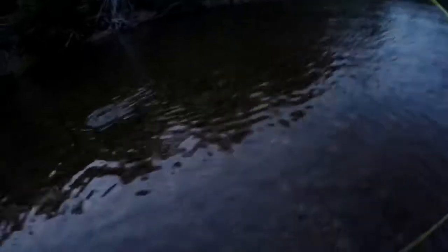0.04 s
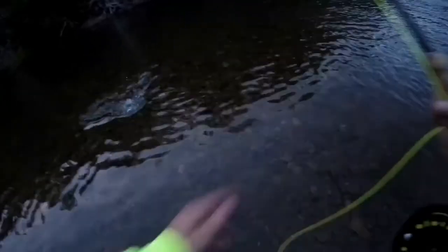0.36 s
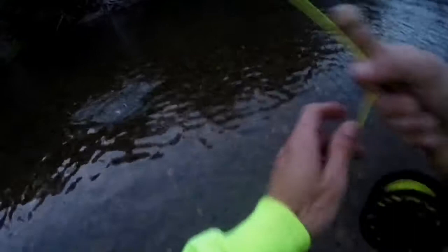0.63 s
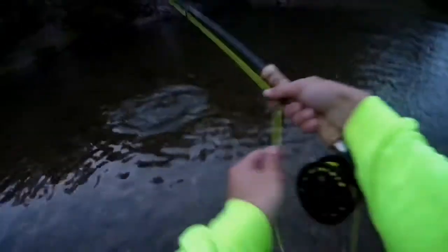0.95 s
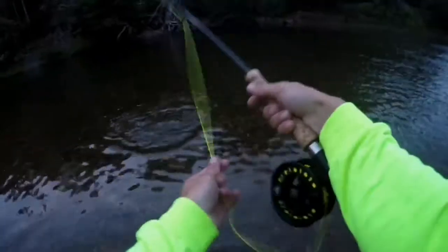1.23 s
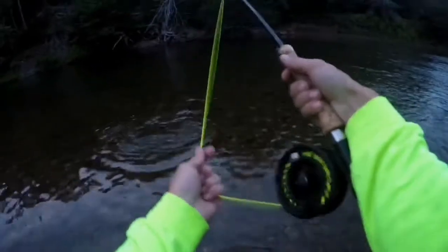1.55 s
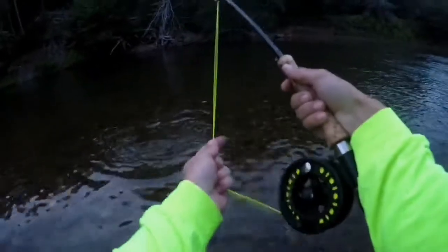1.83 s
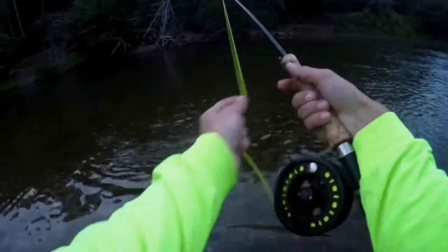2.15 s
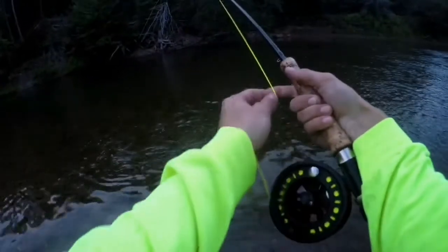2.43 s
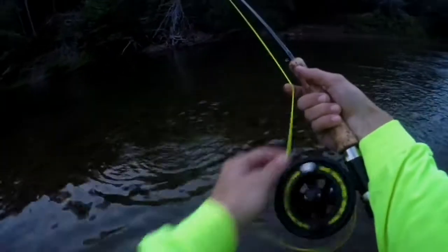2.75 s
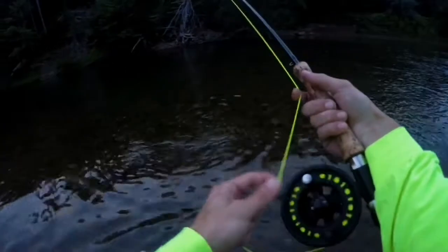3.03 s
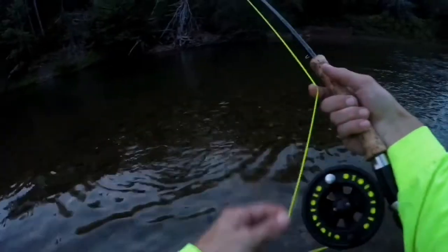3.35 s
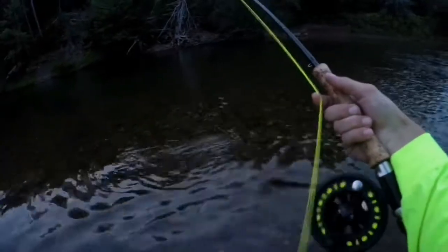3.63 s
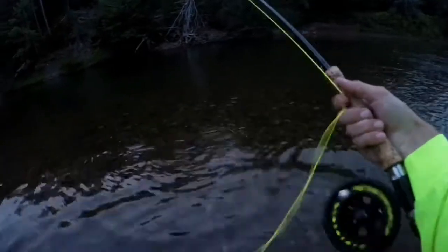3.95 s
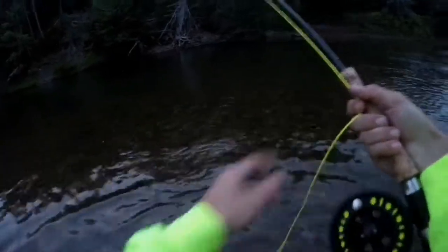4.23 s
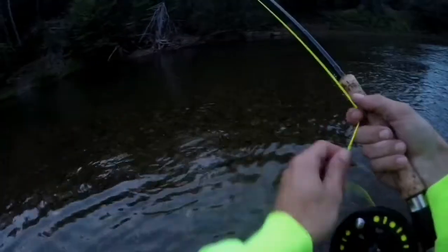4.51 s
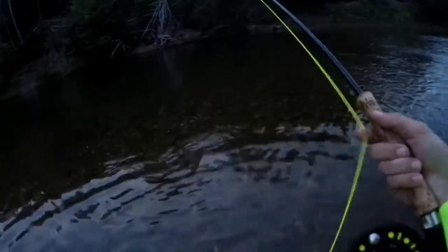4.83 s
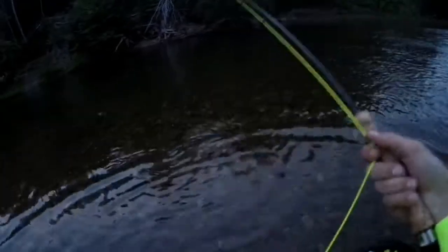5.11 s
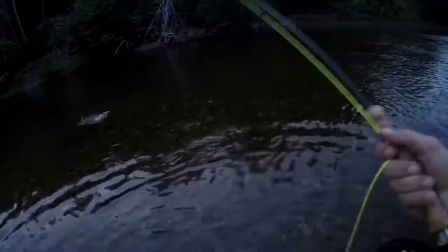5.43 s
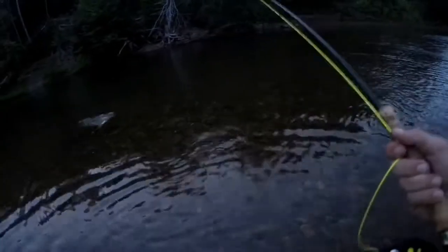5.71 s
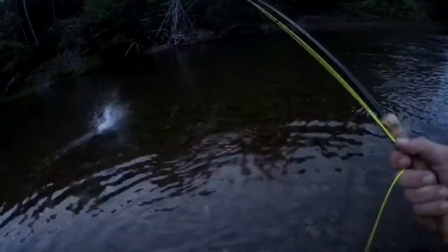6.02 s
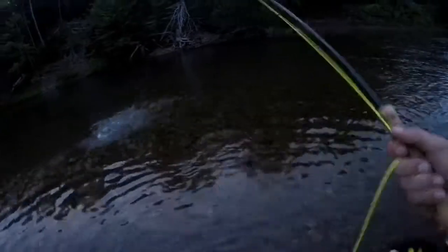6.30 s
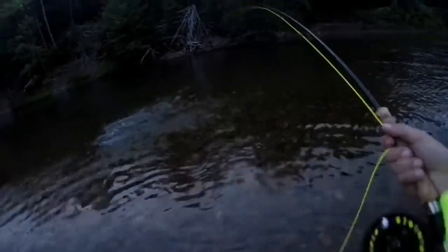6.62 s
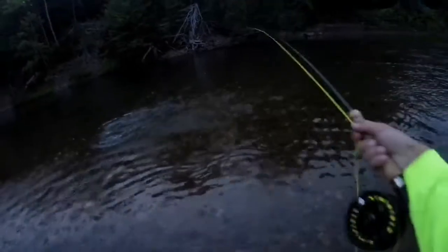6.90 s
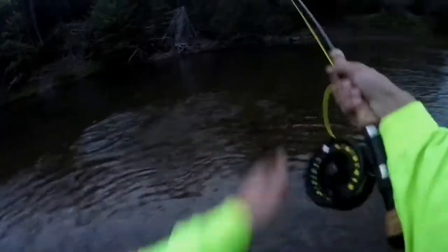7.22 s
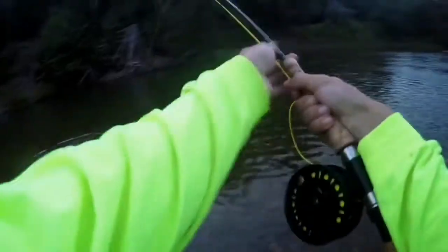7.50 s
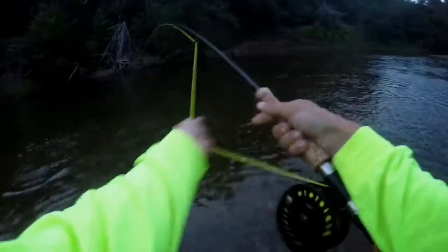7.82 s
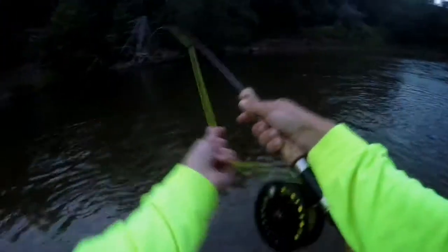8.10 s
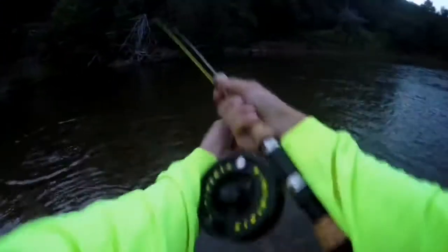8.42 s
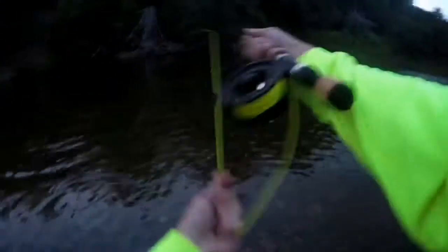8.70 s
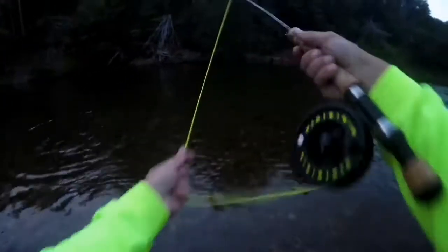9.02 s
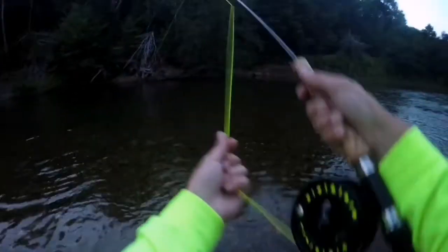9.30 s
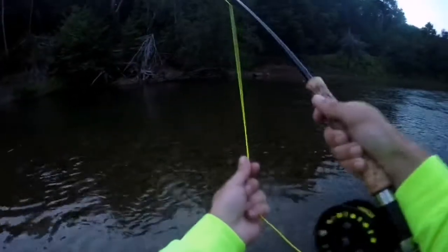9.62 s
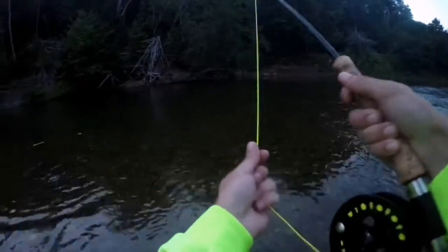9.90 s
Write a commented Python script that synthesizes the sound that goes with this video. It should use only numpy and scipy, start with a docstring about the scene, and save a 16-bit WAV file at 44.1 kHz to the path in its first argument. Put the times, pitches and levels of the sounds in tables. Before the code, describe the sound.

Sleeves swish and wet fishing line rasps softly through the rod rings, over the low rumble and bumps of a body-worn microphone. A fly reel gives short, bright bursts of clicks. About halfway through, a fish splashes lightly, with drops and bubbles. Louder rustling, knocks and thumps follow, with more quick ratcheting near the end. A river washes faintly underneath.

```python
"""A fly reel clicks in short bursts as an angler plays a fish: each tug turns the spool, and the pawl
strikes it once per tooth, exciting its modes. Friction makes the wet line rasp in the rod rings and
the sleeves swish. A body-worn camera rumbles on its mount and is bumped, and the gear knocks.
The fish splashes, trapping bubbles that ring, over the quiet wash of the river."""
import sys
import numpy as np
from scipy import signal
from scipy.fft import rfft, irfft, next_fast_len
from scipy.io import wavfile
from scipy.ndimage import uniform_filter1d

SR = 44100
rng = np.random.default_rng(int(sys.argv[2]) if len(sys.argv) > 2 else 0)


def wrap_up_sound(samples):
    """Save the sound to the file named by the first command line argument, as 16-bit audio."""
    columns = np.atleast_2d(samples).T
    # keep every value between -1 and 1, then stretch to whole-number steps
    tamed = np.clip(columns, -1, 1)
    steps = np.round(tamed * 32767).astype(np.int16)
    wavfile.write(sys.argv[1], SR, steps)


N = 438794
TIME = np.arange(N) / SR


def amp(db):
    """Amplitude ratio of a level in decibels."""
    return np.exp(np.asarray(db) * (np.log(10) / 20))


def unit(x):
    """Normalisation to rms 1."""
    return x / np.sqrt(np.mean(x ** 2) + 1e-20)


def add(mix, s, sound):
    """Superposition: a sound joins the mix at s seconds."""
    part = mix[max(round(s * SR), 0):][:len(sound)]
    part += sound[:len(part)]


def butter(order, hz, kind="low"):
    """Maximally flat filter, as second-order sections."""
    return signal.butter(order, hz, kind, fs=SR, output="sos")


def colour(x, spectrum, resonances=()):
    """Spectral shaping by a broad envelope with resonance peaks; white noise keeps its power."""
    size = next_fast_len(len(x), True)
    hz = np.fft.rfftfreq(size, 1 / SR)
    points_hz, points_db = np.transpose(spectrum)
    broad_db = np.interp(np.log(hz + 1), np.log(points_hz), points_db)
    peaks_db = sum(db / (1 + (2 * (hz - centre) / width) ** 2) for centre, width, db in resonances)
    bass_cut = hz / (hz + points_hz[0] / 2)
    return irfft(rfft(x, size) * unit(amp(broad_db + peaks_db) * bass_cut), size)[:len(x)]


def wander(per_s):
    """Random modulation: smooth noise of rms 1 with a bandwidth of about per_s hertz."""
    size, rate = 16384, 1500
    hz = np.fft.rfftfreq(size, 1 / rate)
    slow = irfft(rfft(rng.standard_normal(size)) * np.exp(-(hz / per_s) ** 2), size)
    return unit(np.interp(TIME, np.arange(size) / rate, slow))


def grains(per_s, spread_db, size=N):
    """Shot noise of rms 1: random impulses, mostly small and a few large."""
    strength = amp(spread_db * np.minimum(rng.exponential(1, size), 4))
    return unit(strength * rng.choice([-1, 1], size) * (rng.random(size) < per_s / SR))


def ring(modes, t, phase=None):
    """Free vibration: a sum of damped modes, excited a little differently at each strike."""
    hz, db, t60 = np.transpose(modes)
    strength = amp(db + rng.standard_normal(len(hz)))
    phase = rng.random(len(hz)) if phase is None else phase
    decay = np.exp(-np.log(1000) * t / t60[:, None])
    return strength @ (np.sin(2 * np.pi * (hz[:, None] * t + phase[:, None])) * decay)


def swells(rows, shape=1.29):
    """Incoherent addition: envelopes sum in power. A shape below 2 is more pointed than a bell."""
    t, power = TIME[::64], 0
    for s, rise_s, fall_s, db in rows:
        away = abs((t - s) / np.where(t < s, rise_s, fall_s))
        power = power + (amp(db) * np.exp(-away ** shape)) ** 2
    return np.interp(TIME, t, np.sqrt(power))


# wash of the river: (frequency [Hz], spectral level [dB])
RIVER_SPECTRUM = [(200, 5.5), (350, -3), (450, -2), (520, -8), (700, -5), (1000, -8.5), (1300, -8),
                  (2000, -11.5), (2350, -10.5), (3600, -12), (5000, -13.5), (8000, -19.5), (12000, -24),
                  (15500, -32)]

def river(level_db=-58.5, ripple_db=0.74):
    """Broadband noise with slight amplitude modulation: the even wash of slow water."""
    return amp(level_db + ripple_db * wander(per_s=16)) * colour(rng.standard_normal(N), RIVER_SPECTRUM)


def bubble(hz, t, cycles=12, glide=3):
    """Bubble resonance: trapped air pulsates as a damped oscillator, rising in pitch."""
    tone = np.sin(2 * np.pi * hz * t * (1 + glide * t))
    return tone * np.exp(-t * hz / cycles) * (1 - np.exp(-t * hz / 2))


# spray thrown up by the fish: (time of peak [s], rise [s], fall [s], level [dB])
SPRAYS = [(5.22, .1, 0.16, -61), (5.768, 0.0097, 0.034, -42.5), (5.862, 0.024, 0.029, -39.5),
          (6.1, 0.58, .38, -54.5)]
# slaps and drops on the water: (time [s], level [dB], bubble frequency [Hz])
DROPS = [(4.7884, -24.5, 2830), (5.1646, -30.5, 2590), (5.237, -34, 2380), (5.2724, -29.5, 1450),
         (5.2919, -35, 1820), (5.494, -31, 1880), (5.59, -36, 1870), (5.7294, -36, 2840),
         (5.759, -28.5, 2660), (5.7744, -31, 2230), (5.8446, -28, 1950), (5.8815, -25, 2480),
         (5.92, -31.5, 1680), (6.0888, -31, 3500), (6.1594, -33.5, 1900), (6.2684, -30, 2560)]
# splashing: (frequency [Hz], spectral level [dB])
SPLASH_SPECTRUM = [(300, -9), (520, -4.5), (650, 1.5), (850, -10.5), (1050, -3), (1300, -9.5), (1700, 2),
                   (2600, 1.5), (3100, -7), (3650, 5), (4300, -12), (5200, -5), (6200, -12.5),
                   (15000, -23.5)]

def fish(spray_db=-0.5, hiss_db=-3, slap_db=-11, slap_s=0.0037, bubble_db=-9):
    """Impact and air entrainment: slaps trap bubbles, and spray falls back as many small drops."""
    t = np.arange(SR // 16) / SR
    patter, bubbles = np.zeros(2 * SR), np.zeros(N)
    for hz in np.geomspace(600, 7000, 24):
        impacts = grains(per_s=90, spread_db=3.5, size=len(patter))
        patter += signal.oaconvolve(impacts, hz * bubble(hz, t, cycles=5.8), "same")
    spray = np.resize(unit(patter), N) / 2 + amp(hiss_db) * rng.standard_normal(N)
    splash = amp(spray_db) * swells(SPRAYS) * spray
    slap_envelope = (1 - np.exp(-t / 0.0016)) * np.exp(-t / slap_s)
    for s, db, hz in DROPS:
        add(splash, s, amp(db + slap_db) * rng.standard_normal(len(t)) * slap_envelope)
        add(bubbles, s, amp(db + bubble_db) * bubble(hz, t))
    return colour(splash, SPLASH_SPECTRUM) + bubbles


# arm strokes: (time of peak speed [s], rise [s], fall [s], level [dB], relative treble [dB])
STROKES = [(.06, 0.14, 0.069, -45, -4.5), (.4, .22, .14, -44.5, 1), (.66, .03, .05, -51, -4),
           (.89, 0.12, 0.11, -43, -5.5), (1.2, 0.15, 0.094, -51.5, -3), (1.47, 0.083, .09, -52, -2),
           (1.85, 0.13, 0.049, -53.5, 1), (2, 0.1, 0.13, -54.5, 0.5), (2.18, 0.036, 0.036, -54.5, -1),
           (2.39, 0.036, 0.089, -52, -2.5), (2.57, 0.063, 0.037, -48.5, -3), (2.67, 0.032, 0.026, -51, 5),
           (2.77, 0.087, 0.13, -48.5, 3), (3.09, .03, 0.042, -54, 3.5), (3.21, .05, .03, -49, 2),
           (3.4, 0.092, 0.099, -59, 6), (3.82, 0.33, 0.14, -53.5, -2), (4.3, 0.16, 0.089, -55, -1),
           (4.9, 0.23, 0.3, -55.5, 2), (5.39, 0.085, 0.052, -58, 5), (6.56, .06, .06, -56, 0),
           (6.72, .07, .12, -53, -1.5), (6.96, .02, 0.029, -55, 9), (7.23, .12, 0.11, -35, -2.5),
           (7.52, 0.11, 0.1, -52.5, -4), (7.79, 0.16, 0.12, -49, 2), (8.14, 0.23, 0.16, -50, 1.5),
           (8.26, 0.039, 0.049, -38.5, -4), (8.34, 0.02, 0.025, -37, 1.5), (8.46, .05, .16, -42.5, -2),
           (8.7, 0.064, 0.1, -46.5, 4.5), (8.86, 0.1, 0.093, -48, 6), (9.08, 0.27, .06, -55, -6),
           (9.235, .03, 0.11, -54, 2), (9.33, .03, .1, -55.5, 2), (9.89, 0.2, 0.088, -59, -2)]

def arms(rest_db=-63):
    """Friction noise grows with sliding speed: body and treble envelopes of cloth never quite at rest."""
    body = swells([(s, rise, fall, db) for s, rise, fall, db, _ in STROKES])
    treble = swells([(s, rise, fall, db + treble_db) for s, rise, fall, db, treble_db in STROKES])
    return np.hypot([body, treble], amp(rest_db))


def rumble(spectrum, even_s):
    """Amplitude levelling: coloured noise divided by its running rms over even_s seconds."""
    noise = colour(rng.standard_normal(N), spectrum)
    return noise / np.sqrt(uniform_filter1d(noise ** 2, int(even_s * SR)) + 1e-3)


# lurches of the angler's body: (time [s], level [dB], half length [s])
LURCHES = [(.5, -33.5, 0.11), (0.966, -24, 0.074), (1.076, -20, 0.049), (1.272, -28, 0.15),
           (2, -27.5, 0.039), (3.173, -24, 0.03), (3.548, -27, 0.036), (3.894, -24.5, 0.049),
           (4.705, -25.5, 0.041), (5.103, -24, 0.057), (5.293, -35, 0.055), (5.486, -21.5, 0.043),
           (5.837, -28, 0.17), (6.245, -23, 0.027), (6.66, -27.5, 0.12), (7.406, -25.5, 0.22),
           (7.9, -23.5, 0.22), (8.35, -14, 0.095), (8.542, -16.5, 0.075), (8.95, -29, .15),
           (9.258, -25, 0.028), (9.75, -33, 0.21)]
# quick moves that jolt the mount: (time [s], level [dB])
JOLTS = [(.055, -25.5), (.46, -33.5), (2.82, -38), (3.12, -42), (3.25, -42), (4.33, -45), (4.65, -43.5),
         (5.02, -44.5), (5.44, -45.5), (6.57, -42.5), (7.15, -32), (7.89, -37.5), (9.23, -42)]
# running shudder of the mount: (time [s], level [dB])
SHUDDER_LEVELS = [(0, -34), (.2, -37.5), (.95, -35), (1.25, -48), (2.1, -47.5), (2.25, -60), (2.7, -45),
                  (2.95, -57.5), (4.6, -49.5), (5.8, -55), (6.85, -52), (7.38, -27), (7.48, -47.5),
                  (8.15, -43.5), (8.3, -33.5), (8.7, -31), (8.8, -42.5), (9.95, -54.5)]
# slow sway and quicker shudder: (frequency [Hz], spectral level [dB])
SWAY_SPECTRUM = [(5, -17), (11, 0), (18, 5), (24, -1), (36, -7.5), (50, -13.5), (70, -24.5), (110, -31.5),
                 (250, -80.5)]
SHUDDER_SPECTRUM = [(40, -11), (70, -3), (100, 0.5), (122, 1), (160, -10.5), (220, -16), (320, -26),
                    (600, -65)]

def mount(sway_rest_db=-34.5, shudder_db=-2, arm_db=1, throb_db=2.5, jolt_half_s=0.029):
    """Structure-borne sound: the body sways, and arm moves and jolts shake the camera on its mount."""
    lurches = swells([(s, half_s, half_s, db) for s, db, half_s in LURCHES])
    sway = np.hypot(amp(sway_rest_db), lurches)
    jolts = swells([(s, jolt_half_s, jolt_half_s, db) for s, db in JOLTS])
    running_db = np.interp(TIME, *np.transpose(SHUDDER_LEVELS)) + shudder_db
    shake = np.hypot(amp(running_db), amp(arm_db) * arms()[0])
    shudder = np.hypot(shake * amp(throb_db * wander(per_s=16)), jolts)
    return sway * rumble(SWAY_SPECTRUM, even_s=0.149) + shudder * rumble(SHUDDER_SPECTRUM, even_s=0.07)


# bumps on the camera: (time [s], push level [dB], push length [s], case level [dB])
BUMPS = [(0.05, -17.5, 0.012, -46), (0.461, -21, 0.011, -54), (0.948, -17, 0.021, -45),
         (7.297, -8.5, 0.0079, -33), (8.292, -14, 0.0023, -50), (8.34, -6.5, 0.025, -43.5),
         (8.499, -10, 0.022, -56), (8.61, -12, 0.019, -55)]
# modes of its hollow case: (frequency [Hz], level [dB], T60 [s])
CASE_MODES = [(264, 4.5, 0.087), (335, 13, 0.041), (397, 13.5, 0.013), (456, 4.5, 0.071), (632, 15.5, 0.02),
              (870, 7, .02)]

def bumps(rise_s=0.0018):
    """Impulse response of the camera: a push and its rebound, with a short ring of the case."""
    out, t = np.zeros(N), np.arange(SR // 8) / SR
    onset = 1 - np.exp(-t / rise_s)
    for s, push_db, length_s, case_db in BUMPS:
        progress = t / length_s
        push = progress * (1 - progress) * np.exp(-2 * progress)
        add(out, s, onset * (amp(push_db) * push / push.max() + amp(case_db) * ring(CASE_MODES, t)))
    return out


# knocks of the gear: (time [s], tock level [dB], relative thud level [dB])
KNOCKS = [(0.025, -23.5, -4), (.658, -34, -3), (.944, -25.5, 4), (3.5625, -25.5, -4), (6.756, -37, -3.5),
          (6.98, -23.5, -18), (7.182, -31, 4), (8.442, -30.5, -8), (9.889, -30, -8)]
# modes of the gear: (frequency [Hz], level [dB], T60 [s])
GEAR_MODES = [(678, -2, 0.019), (847, 6, 0.018), (1019, 9, 0.015), (1430, -9.5, 0.029), (1714, -5.5, 0.026),
              (2004, 9, 0.0082)]

def knocks(rise_s=0.0015, thud_hz=108, thud_s=0.015):
    """Impact excitation: the gear gives a hollow tock, and the mount a few low, damped swings."""
    out, t = np.zeros(N), np.arange(SR // 8) / SR
    onset = 1 - np.exp(-(t / rise_s) ** 2)
    thud = onset * np.sin(2 * np.pi * thud_hz * t) * np.exp(-t / thud_s)
    for s, db, thud_db in KNOCKS:
        tock = onset * ring(GEAR_MODES, t)
        add(out, s, amp(db) * (tock / abs(tock).max() + amp(thud_db) * thud))
    return out


# cloth rubbing on cloth: (frequency [Hz], spectral level [dB])
CLOTH_SPECTRUM = [(120, -16), (250, 2.5), (450, -4), (800, -1), (1300, -5.5), (2000, -5.5), (3200, -13),
                  (4800, -17), (6000, -16), (9000, -24.5), (13500, -32), (16000, -44)]
# resonances it is heard through: (frequency [Hz], bandwidth [Hz], gain [dB])
CLOTH_RESONANCES = [(451, 59, 7), (640, 210, 6.8), (1020, 330, 11), (1815, 610, 8.4), (2033, 70, 8.7),
                    (2578, 100, 10), (2886, 330, 11.4), (3536, 160, 14.3), (4354, 240, 11.4),
                    (4810, 310, 11.4), (8050, 350, 7.1)]
# brief, bright scrapes of sleeve on jacket: (time [s], level [dB], half length [s])
SCRAPES = [(0.873, -35.5, 0.007), (1.317, -44.5, 0.016), (1.857, -44, 0.015), (3.085, -55, .022),
           (3.234, -57, 0.0078), (3.818, -49, 0.015), (4.786, -49, 0.012), (9.34, -50, 0.012)]

def sleeves(grain_share=0.64, flutter_db=2.5, catch_db=1.29, scrape_db=-1, scrape_body_db=-8):
    """Stick-slip friction: the weave catches and slips in tiny grains, unevenly within each stroke."""
    slips = grains(per_s=2200, spread_db=2.5)
    rub = np.sqrt(grain_share) * slips + np.sqrt(1 - grain_share) * rng.standard_normal(N)
    cloth = colour(rub * amp(flutter_db * wander(per_s=106)), CLOTH_SPECTRUM, CLOTH_RESONANCES)
    dull = signal.sosfiltfilt(butter(1, hz=1500), cloth)
    scrape = sum(amp(db + scrape_db) * np.exp(-((TIME - s) / half_s) ** 2) for s, db, half_s in SCRAPES)
    body, treble = arms() * amp(catch_db * wander(per_s=29))
    return (body + amp(scrape_body_db) * scrape) * dull + (treble + scrape) * (cloth - dull)


# line sliding through the rod rings: (time of peak speed [s], rise [s], fall [s], level [dB])
SLIDES = [(.07, .02, 0.021, -51), (.37, 0.19, 0.11, -55), (1.15, 0.12, 0.14, -56.5), (1.53, .07, .08, -64),
          (1.85, 0.17, .1, -64), (3.5, 0.36, .2, -60.5), (4.78, 0.16, .1, -57), (6.85, 0.036, 0.03, -56),
          (7, 0.04, .025, -50.5), (8.59, 0.045, 0.031, -40), (8.97, .12, .09, -54.5)]
# line ticking against rod and fingers: (time [s], level [dB], relative treble [dB])
TICKS = [(1.063, -32, -13), (1.132, -33.5, 4), (1.216, -35, 8), (1.234, -31.5, 6), (2.655, -37.5, 5),
         (4.787, -33, -8), (6.825, -38, 16), (6.843, -32, 4), (6.964, -35, 3), (6.998, -36, 8),
         (7.011, -30.5, -12), (7.342, -38, 17), (7.368, -30, -15)]
# one tick: (frequency [Hz], spectral level [dB])
TICK_SPECTRUM = [(1200, -6), (2500, -2.5), (3700, 4), (5200, -3.5), (6800, -3.5), (8500, -15.5),
                 (12000, -18), (16000, -25)]

def line(rasp_db=-1, rasp_hz=3600, width_hz=240, tick_db=-9, tick_s=0.0027):
    """Friction drives one narrow resonance as wet line slides; the line ticks where it catches."""
    resonance = butter(1, [rasp_hz - width_hz / 2, rasp_hz + width_hz / 2], "band")
    rasp = signal.sosfilt(resonance, grains(per_s=1500, spread_db=3.5))
    ticks, t = np.zeros(N), np.arange(SR // 30) / SR
    for s, db, treble_db in TICKS:
        noise = colour(rng.standard_normal(len(t)), TICK_SPECTRUM)
        dull = signal.sosfiltfilt(butter(2, hz=5500), noise)
        tick = unit(dull + amp(treble_db) * (noise - dull)) * np.exp(-t / tick_s)
        add(ticks, s, amp(db + tick_db) * tick)
    return amp(rasp_db) * swells(SLIDES) * unit(rasp) + ticks


# the spool moves one tooth: (time [s], level [dB], ring centre [Hz], low modes [dB], high modes [dB])
NUDGES = [(1.8853, -21.5, 6800, 0, -6), (2.7254, -34.5, 6410, 0, 2), (2.7587, -32.5, 6400, -12, -1),
          (5.208, -25.5, 6660, 5.5, -8), (7.796, -24, 6750, 1, -8), (7.8292, -24, 6950, 5, -6),
          (8.2775, -14, 7160, -7, -20), (8.3042, -17.5, 7150, -3, -13), (8.337, -16.5, 7100, -1, -17)]
# a tug spins the spool, which then coasts: (time [s], pull [s], coast [s], 3 speeds [teeth/s],
# 3 levels [dB], ring centre [Hz], low modes [dB], high modes [dB]); triples are start, end of pull, end
SPINS = [(1.461, 0.041, .088, 64, 33.3, 19.3, -21, -26.5, -22, 6520, -3, -5),
         (3.4682, 0.0066, 0.073, 40.5, 50, 13, -26, -24, -20.5, 6800, 0.5, -3),
         (3.605, .18, .1098, 74, 149.8, 39.1, -22, -24, -23.5, 6720, -1.5, -6.5),
         (8.539, .026, .1381, 119.5, 162, 30.6, -24, -22, -26, 6600, -2.5, -7.5),
         (8.7825, 0.052, 0.09, 33, 98.2, 24.6, -22, -17, -20.5, 6680, -9.5, -10)]

def pawl_strikes(usual_teeth_per_s=93, jitter_s=0.00016, spread_db=1, spread_hz=120, colour_db=2.4):
    """Rotation is the integral of speed: one strike for each tooth passed, in rows like NUDGES."""
    strikes = list(NUDGES)
    for start_s, pull_s, coast_s, *motion, ring_hz, lows_db, highs_db in SPINS:
        speeds, levels_db = motion[:3], motion[3:]
        stages = [0, pull_s, pull_s + coast_s]
        t = np.arange(0, stages[-1], 1 / SR)
        turned = np.cumsum(np.interp(t, stages, speeds)) / SR
        teeth = np.linspace(0, turned[-1], round(turned[-1]) + 1)
        for at in np.interp(teeth, turned, t):
            # a faster spool rings thinner and a little higher
            doublings = np.log2(np.interp(at, stages, speeds) / usual_teeth_per_s)
            force, pitch, low, high, late = rng.standard_normal(5)  # no two teeth are alike
            strikes.append((start_s + at + jitter_s * late,
                            np.interp(at, stages, levels_db) + spread_db * force,
                            ring_hz + 40 * doublings + spread_hz * pitch,
                            lows_db - 2 * doublings + colour_db * low,
                            highs_db + colour_db * high))
    return sorted(strikes)


# modes of the reel: (frequency [Hz], level [dB], T60 [s])
REEL_MODES = [(2870, -6, 0.0038), (3490, -3, 0.0041), (4330, -6.5, 0.012), (4930, -7.5, 0.012),
              (5480, -9, 0.0075), (6610, 1, 0.0098), (7070, 0.5, 0.0082), (8000, -10.5, 0.0083),
              (9040, 0, 0.0041), (10310, -3, 0.0058), (11080, -4.5, 0.0053), (12100, -7.5, 0.0052),
              (14500, -17, 0.0054)]

def reel(centre_hz=6775, lift_db=2, rise_s=0.00059, snap_s=0.0017, tail_s=0.0028, rebound_s=0.0043):
    """Modal ringing: each snap of the pawl rings the spool briefly; fast, alike clicks fuse to a buzz."""
    out, t = np.zeros(N), np.arange(SR // 30) / SR
    hz, db, t60 = np.transpose(REEL_MODES)
    low, high = hz < 5800, hz > 8500
    phase, snap = rng.random(len(hz)), rng.standard_normal(len(t))
    snap_filter = butter(1, 4500, "high")
    snap_fade = amp(-10) * np.exp(-t / snap_s) + amp(-33) * np.exp(-t / tail_s)
    onset = 1 - np.exp(-(t / rise_s) ** 2)
    for s, level_db, ring_hz, lows_db, highs_db in pawl_strikes():
        # the click changes only gradually as the spool turns
        phase = phase + 0.07 * rng.standard_normal(len(hz))
        snap = 0.8 * snap + 0.6 * rng.standard_normal(len(t))
        detune = 1 + 0.011 * rng.standard_normal(len(hz))
        modes_hz = hz * detune * np.where(high, 1, np.sqrt(ring_hz / centre_hz))
        modes_db = db + low * (lows_db + lift_db) + high * (highs_db + lift_db)
        ringing = ring(np.transpose([modes_hz, modes_db, t60]), t, phase)
        click = onset * (ringing + signal.sosfilt(snap_filter, snap) * snap_fade)
        click /= np.sqrt(np.sum(click ** 2) / 14)  # equal energy before the level is set
        add(out, s, amp(level_db) * click)
        # the pawl rebounds once, as hard as its spring allows
        rebound_db = min(-34, level_db - 14)
        add(out, s + rebound_s * rng.uniform(0.94, 1.2), amp(rebound_db) * click)
    return signal.sosfilt(butter(2, 1500, "high"), out)


def scene():
    """Superposition of all sources at one microphone."""
    return (reel() + line() + sleeves() + mount() + knocks() + bumps() + fish() + river())[None]


def record(dry):
    """Band limiting: a steep low-pass filter removes the highest treble."""
    low_pass = signal.firwin(255, 15950, window=("kaiser", 9), fs=SR)
    return signal.oaconvolve(dry, low_pass[None], "same")


dry = scene()
out = record(dry)
wrap_up_sound(out)
```